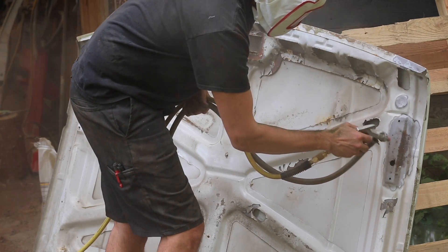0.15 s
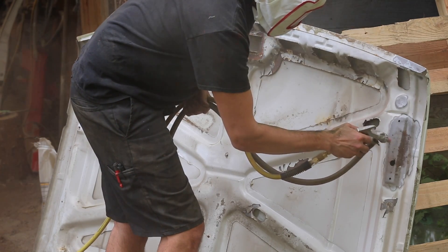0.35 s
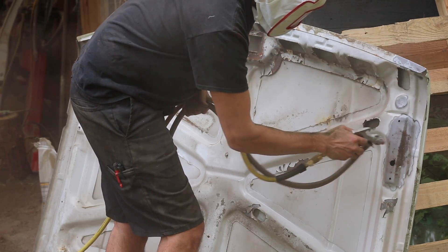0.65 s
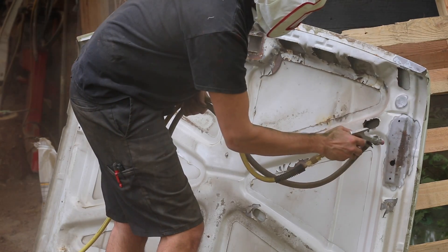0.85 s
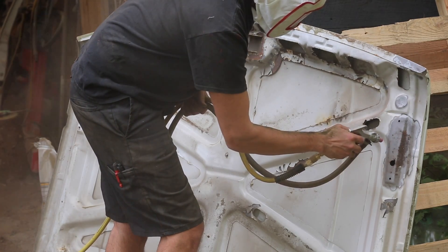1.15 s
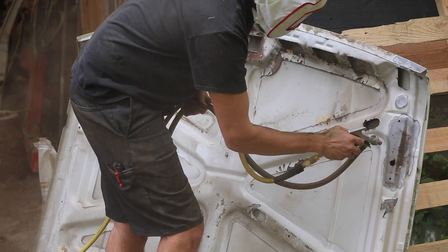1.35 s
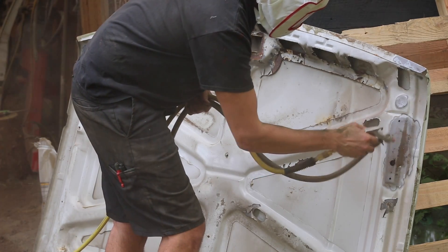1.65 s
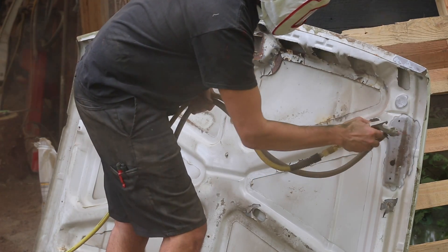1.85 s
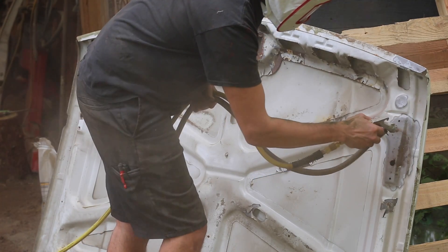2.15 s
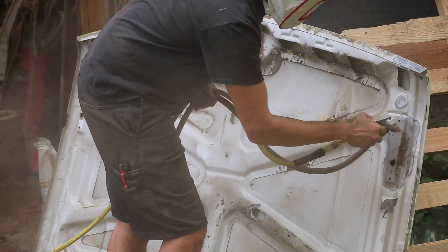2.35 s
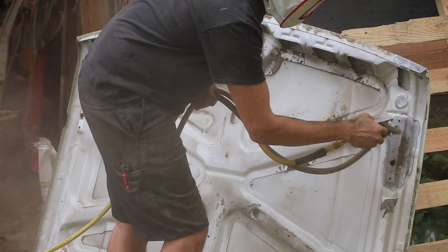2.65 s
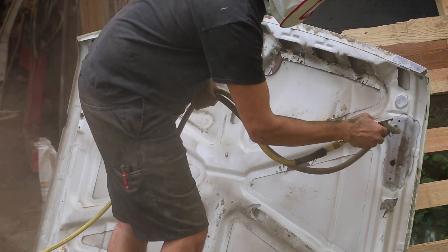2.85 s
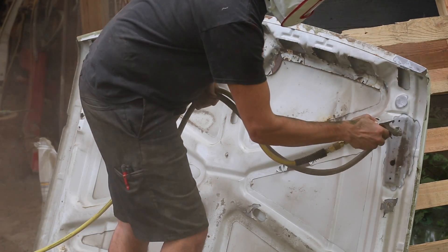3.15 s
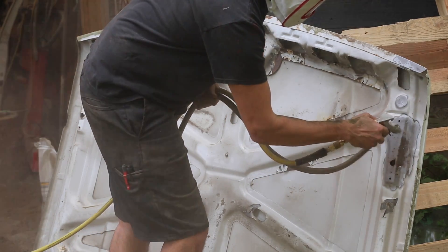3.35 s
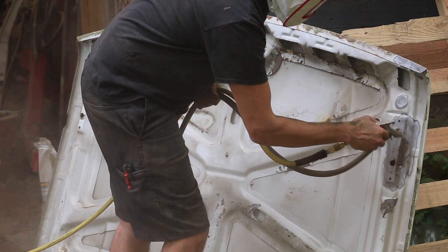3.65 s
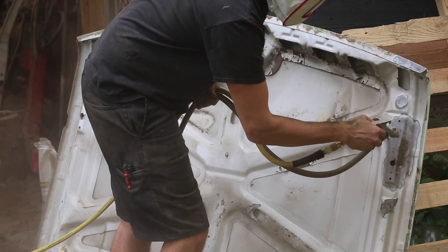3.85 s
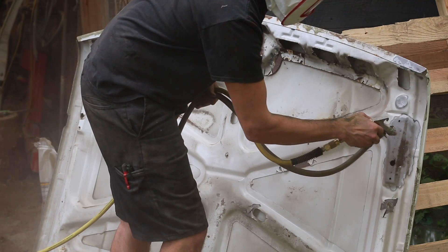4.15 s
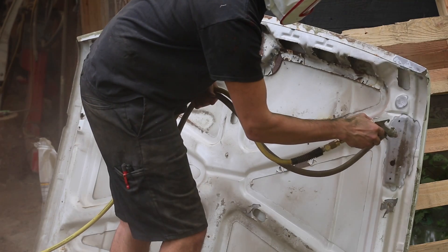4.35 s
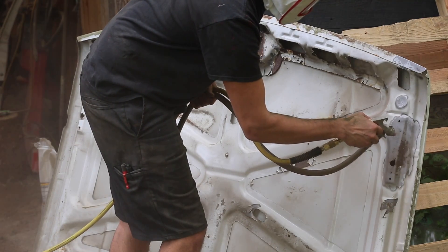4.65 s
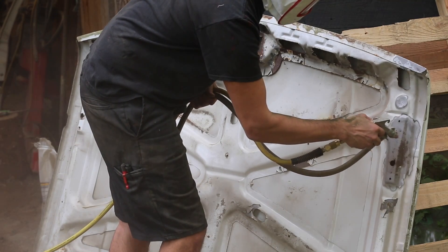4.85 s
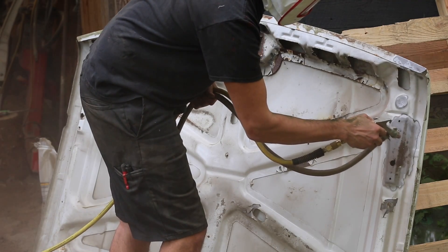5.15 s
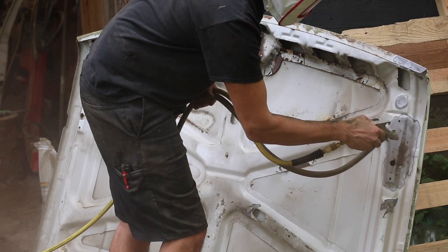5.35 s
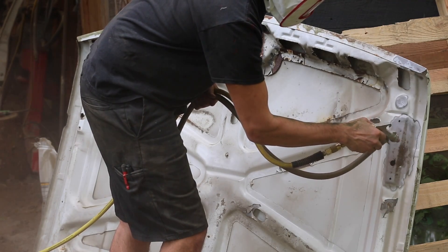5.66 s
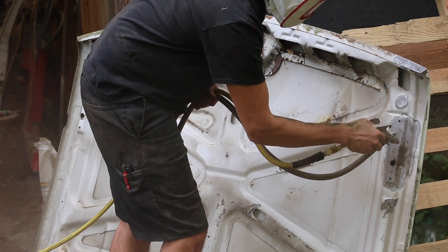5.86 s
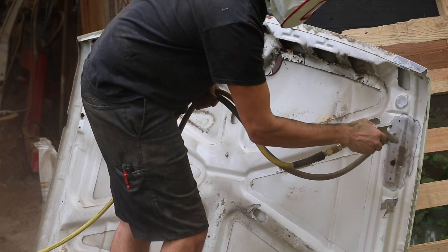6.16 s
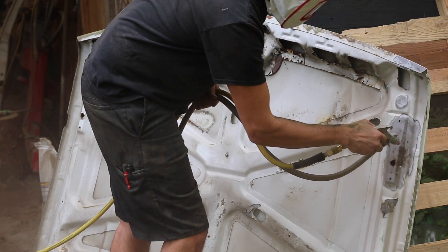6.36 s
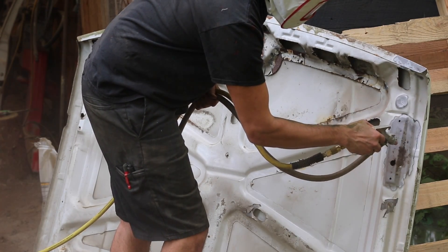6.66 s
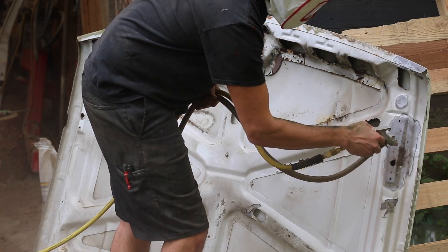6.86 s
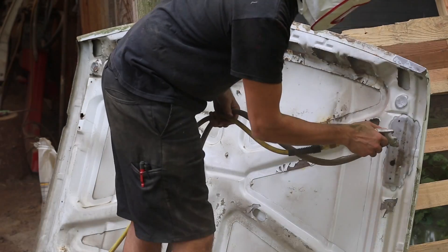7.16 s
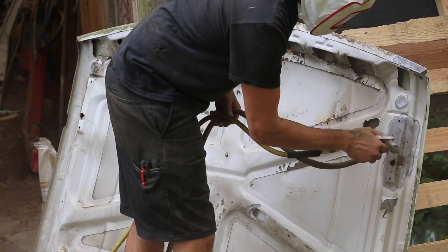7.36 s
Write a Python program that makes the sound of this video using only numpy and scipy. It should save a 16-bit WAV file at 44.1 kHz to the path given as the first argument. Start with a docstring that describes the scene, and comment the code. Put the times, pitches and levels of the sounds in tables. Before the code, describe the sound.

Continuous abrasive blasting heard close, almost mono: airy treble, gritty fizz and a scouring hiss strongest near 4 kHz, pulsing with quick irregular strokes. The jet is airier and rougher early, steadier and more scouring through the middle, then forceful again near the end with a momentary dropout. The steel panel adds hollow midrange roar, without clear ringing, and a distant compressor throbs quietly in the barn.

```python
"""In a barn, a hand-held blasting gun sweeps to and fro over a bare steel panel, five or six strokes a second.
The jet and its grit are patchy noise in three bands that swell with each stroke: air hiss, fizz, scouring.
The sheet rings as noise through its resonances; pressed channels and hollows roar as moving noise bands.
A piston compressor drones farther off: shaft orders, motor hum and a throbbing rumble.
One small microphone hears it all, nearly the same on both channels."""
import sys
import numpy as np
from scipy import signal
from scipy.fft import rfft, irfft, next_fast_len
from scipy.io import wavfile
from scipy.ndimage import uniform_filter1d, map_coordinates

SR = 44100
rng = np.random.default_rng(int(sys.argv[2]) if len(sys.argv) > 2 else 0)


def level_to_linear(level):
    """Convert decibel levels to linear amplitude factors, elementwise."""
    exponent = np.asarray(level, float) / 20
    return 10 ** exponent


def dump_mix(stems):
    """Bounce the given channels to the path in sys.argv[1] as a 16-bit WAV at rate SR."""
    frames = np.atleast_2d(stems).T  # one column per channel
    limited = np.clip(frames, -1, 1)  # hard clip at full scale
    pcm = np.round(limited * 32767).astype(np.int16)
    wavfile.write(sys.argv[1], SR, pcm)


N = 331191

# Resonances of the steel sheet. Each row: centre in Hz, width in Hz, relative level in dB.
SHEET_MODES = [(312, 54, -11), (493, 63, -3), (603, 44, -4.5), (749, 84, -6.5), (843, 51, -2),
               (933, 140, -2), (1175, 264, -2.5), (1520, 93, 1.5), (1862, 79, 2), (2330, 540, -1)]


def unit(x):
    """Scale to rms 1."""
    return x / np.sqrt(np.mean(x ** 2) + 1e-20)


def along(points, hz):
    """Read (Hz, value) points on a log frequency axis."""
    f, v = np.transpose(points)
    return np.interp(np.log(hz + 1), np.log(f + 1), v)


def curves(rows):
    """One value per sample for each column after the time."""
    s, *columns = np.transpose(rows)
    return [np.interp(np.arange(N) / SR, s, column) for column in columns]


def wobble(rate):
    """A smooth random curve, rate knots a second."""
    knots = rng.standard_normal(int(N * rate / SR) + 4)
    return map_coordinates(knots, [np.arange(N) * rate / SR])


def filtered(x, response):
    """Filter x by a complex response of frequency."""
    m = next_fast_len(N + SR // 4)
    return irfft(rfft(x, m) * response(np.fft.rfftfreq(m, 1 / SR)), m)[..., :N]


def swells(middle_s, length_s):
    """One flat-topped rise and fall from 0 to 1 for each event, on a 1 ms grid; length is between 1/e points."""
    s = np.arange(0, N / SR + .002, .001)
    return np.exp(-np.abs(2 * (s - middle_s[:, None]) / np.reshape(length_s, (-1, 1))) ** 3)


def fine(coarse):
    """From the 1 ms grid to one value per sample."""
    return np.interp(np.arange(N) / SR, np.arange(len(coarse)) / 1000, coarse)


def turbulence(patchy_db, centre_hz=None, width=None):
    """Noise with patches of random gain; a cavity keeps a band, width in octaves, round its moving centre."""
    hz, t, z = signal.stft(rng.standard_normal(N), SR, nperseg=512)
    field = uniform_filter1d(rng.standard_normal(z.shape), size=9, axis=0)
    field = uniform_filter1d(field, size=9, axis=1)
    z = z * level_to_linear(patchy_db * unit(field))
    if width:
        centre = centre_hz[np.minimum(t * SR, N - 1).astype(int)]
        octaves_off = np.log2((hz[:, None] + 1) / centre)
        shape = np.exp(-.5 * (octaves_off / width) ** 2)
        z = z * shape / np.linalg.norm(shape, axis=0)  # equally loud at every pitch
    return unit(signal.istft(z, SR, nperseg=512)[1][:N])


def sheet_response(f):
    """Sum of the sheet's resonances; neighbours alternate in sign."""
    total = 0
    for k, (centre, width, db) in enumerate(SHEET_MODES):
        damping = 1j * f * width
        total = total + (-1) ** k * level_to_linear(db) * damping / (centre ** 2 - f ** 2 + damping)
    return total


def sweep():
    """Levels in dB of air, fizz, scouring, channels and sheet, from the gun's aim and its strokes."""
    # Where the gun points, between strokes. Each row: time in seconds, air jet in dB, grit over air in dB.
    aim = [(0.0, -36.5, -5.5), (0.75, -32, -8), (0.85, -41.5, -3.5), (1.25, -35, -7.5), (1.5, -35, -9),
           (1.75, -36, -3.0), (2.3, -36.0, -2.5), (3.0, -36.5, -3.0), (3.6, -35.0, -2.0), (4.4, -40, 1),
           (5.0, -38, 0.0), (5.7, -37.5, -1.5), (6.12, -38, -3), (6.35, -37.5, -2), (6.5, -32, -3.0),
           (7.16, -30.5, -1.5), (7.2, -36.0, -3), (7.51, -38.5, -0.5)]
    # Each stroke swells the blast. Each row: middle in seconds, length in seconds,
    # air swell in dB, grit swell in dB, channel swell in dB.
    strokes = [(0.032, 0.08, 4, 4.5, 7), (0.222, 0.27, 3.5, 2, 4.5), (0.495, 0.14, 3, 1.0, 4),
               (0.677, 0.14, 1.0, 3.5, 10), (0.938, 0.19, 9.0, 3.5, 5.0), (1.145, 0.15, 5.5, 4, 6),
               (1.39, 0.21, -0.5, -1.5, 5), (1.573, 0.05, 4, 1.5, 6), (1.655, 0.13, 4, 5.5, 17.5),
               (1.934, 0.13, 3, 5.5, 10.5), (2.155, 0.12, 4, 4.0, 10), (2.403, 0.12, 6, 5, 7.5),
               (2.603, 0.13, 3, 3.5, 3), (2.84, 0.11, 4.5, 5, 5), (3.04, 0.11, 4.5, 5.5, 6),
               (3.268, 0.21, 4.5, 5, 4), (3.394, 0.07, 3, 3, 4.5), (3.537, 0.1, 1.5, 2.5, 0),
               (3.746, 0.13, 6.5, 4, 6), (3.872, 0.06, 2.5, 1.5, 5), (4.109, 0.38, 3.0, 2.5, 2),
               (4.303, 0.11, 6.5, 0, 2), (4.527, 0.14, 5.5, 0.5, 1.0), (4.662, 0.08, 3.5, 2.0, 5),
               (4.761, 0.083, 5.5, -0.5, -2), (4.9, 0.11, 7, 4, 7), (5.111, 0.12, 6, 4, 3.5),
               (5.301, 0.14, 6.5, 4, 6), (5.526, 0.09, 5, 4, 3), (5.627, 0.088, 3.5, 1.0, 1),
               (5.785, 0.1, 2.5, 3, 2.5), (5.873, 0.1, 5, 1.0, 1), (5.992, 0.16, 3, 3, 2),
               (6.22, 0.091, 6.5, 6, 5), (6.316, 0.066, 5, 0.5, -1), (6.425, 0.11, 8, 4, 6),
               (6.68, 0.2, 3, 3.5, 6), (6.883, 0.14, 4, 3, 3.5), (7.036, 0.12, 3.5, 0, 2.0),
               (7.11, 0.09, 3.5, -1, 2), (7.387, 0.13, 3.5, 2, 1), (7.518, 0.06, 11, 7.5, 4.0)]
    usual_air_db = -36
    return_gap_s, return_s, return_db = .19, .06, 2

    aim_db, grit_db = curves(aim)
    s, length, air, grit, channel = np.transpose(strokes)
    stroke = swells(s, length)
    # between strokes set far apart the gun swings back half-way, and only the air swells
    back = ((s[1:] + s[:-1]) / 2)[np.diff(s) > return_gap_s]
    air_db = aim_db + fine(air @ stroke + return_db * swells(back, return_s).sum(axis=0))
    grit_swell_db = fine(grit @ stroke)
    fizz_db = aim_db + grit_db + grit_swell_db

    over_usual_db = aim_db - usual_air_db
    nearer_db = 0.69 * over_usual_db  # scouring and channels follow the air alike
    scour_db = -32 + nearer_db + 1.01 * grit_db + 0.5 * grit_swell_db
    over_channel = swells(s, 0.95 * length)  # part of the stroke spent over the channel
    channel_db = -44.5 + nearer_db + 1.32 * grit_db + fine(channel @ over_channel)
    ring_db = -42.5 + 0.8 * over_usual_db + 0.77 * grit_db
    return air_db, fizz_db, scour_db, channel_db, ring_db


def compressor():
    """Piston compressor: steady shaft orders and motor hum over a barn rumble that throbs once a turn."""
    # Tones of the shaft. Each row: multiple of the shaft rate, relative level in dB.
    orders = [(1, -26), (2, -4.5), (3, -8.5), (4, 0.5), (5, -15), (6, 2.5), (7, -16), (8, 1), (9, -3.5),
              (10, -11), (11, 1), (12, -20), (13, -9), (14, -34), (15, 1.5), (16, -30), (17, -1)]
    # Motor hum: frequency in Hz, mean level in dB.
    hum_hz, hum_db = (119.6, -73.5)
    # Colour of the compressor's rumble in the barn. Each row: frequency in Hz, relative density in dB per Hz.
    barn = [(18, -39), (30, -15), (118, 9), (258, -4), (296, -8), (339, -4), (450, 15), (580, -30),
            (990, -120)]
    shaft_hz = 23.1

    t = np.arange(N) / SR
    turn = 2 * np.pi * shaft_hz * t + 0.047 * wobble(1.56)
    tones = 0
    for k, db in orders:
        level = level_to_linear(db - 66 + 0.73 * wobble(2.7))
        tones = tones + level * np.sin(k * turn + rng.uniform(0, 2 * np.pi))
    hum = level_to_linear(hum_db + 1.7 * wobble(3.4)) * np.sqrt(2) * np.sin(2 * np.pi * hum_hz * t)
    rumble = unit(filtered(rng.standard_normal(N), lambda f: level_to_linear(along(barn, f))))
    return tones + hum + level_to_linear(-65.5 + 1.4 * np.sin(turn)) * rumble


def hollows():
    """Deep hollows roar through the sheet as the jet crosses them, and flex the sheet as a whole."""
    # Each row: middle of the crossing in seconds, length in seconds, peak level in dB, pitch in Hz.
    crossings = [(0.053, 0.18, -45.5, 880), (.27, 0.31, -45.5, 535), (0.495, 0.31, -45.5, 550),
                 (0.739, 0.092, -42, 600), (0.945, 0.15, -43, 623), (1.16, 0.13, -47.5, 530),
                 (1.36, 0.15, -51.5, 560), (1.555, 0.07, -44.5, 605), (1.92, 0.16, -54, 900),
                 (2.144, 0.11, -49.5, 880), (2.495, 0.25, -52, 860), (2.843, 0.074, -49, 740),
                 (3.05, 0.06, -54, 640), (3.268, 0.11, -50.5, 640), (3.4, .07, -50, 795),
                 (3.615, 0.054, -47, 866), (3.77, 0.087, -54, 700), (4.08, 0.057, -47.5, 774),
                 (4.22, .16, -55, 655), (4.43, 0.053, -54, 670), (4.63, 0.067, -56, 680),
                 (4.77, .05, -52, 620), (4.91, 0.088, -45, 570), (5.121, 0.051, -44, 535),
                 (5.296, 0.094, -46.5, 594), (5.543, .08, -51, 640), (5.656, .06, -53.5, 600),
                 (5.877, 0.045, -46, 540), (6.237, .09, -49.5, 660), (6.446, 0.094, -45, 603),
                 (6.684, 0.1, -44.5, 710), (6.885, 0.1, -43.5, 610), (7.11, 0.095, -41, 640),
                 (7.373, 0.062, -51.5, 620), (7.51, .06, -48, 680)]
    shallow_db, shallow_hz = -57, 823  # the roar between hollows
    drum_hz = 311  # the sheet flexing as a whole

    s, length, peak_db, hz = np.transpose(crossings)
    over = swells(s, length)
    roar_db = fine(shallow_db + np.max((peak_db - shallow_db)[:, None] * over, axis=0))
    # pitch is the mean of the hollows under the jet, with a little of the shallow pitch
    roar_hz = fine((hz @ over + .1 * shallow_hz) / (over.sum(axis=0) + .1))
    roar = turbulence(patchy_db=0.65, centre_hz=roar_hz, width=0.34)
    roar = unit(filtered(roar, sheet_response))
    drum = turbulence(patchy_db=3.0, centre_hz=np.full(N, drum_hz), width=0.13)
    drum_db = roar_db - 12.0 - 12 * np.log2(roar_hz / 550)  # low-pitched hollows shake the sheet most
    return level_to_linear(roar_db + 0.18 * wobble(11)) * roar + level_to_linear(drum_db) * drum


def channels(level_db):
    """Narrow pressed channels roar round a wavering pitch when the jet blows across them."""
    channel_hz = 2040 * (1 + .04 * wobble(8))
    return level_to_linear(level_db) * turbulence(patchy_db=1.1, centre_hz=channel_hz, width=.42)


def sheet_ring(level_db):
    """The sheet rings under the grit: patchy noise excites its resonances."""
    return level_to_linear(level_db) * unit(filtered(turbulence(patchy_db=1.52), sheet_response))


def hiss_band(x, low_hz, high_hz, order=10):
    """One soft-edged slice of the jet's colour, rms 1."""
    # The jet as the microphone port colours it. Each row: frequency in Hz, relative density in dB per Hz.
    hiss = [(1300, -46), (2200, -18.5), (2650, -12), (3250, -6), (3850, -2.5), (4250, -6.5), (4800, -15.5),
            (5250, -12.5), (5950, -11), (7550, -9.5), (9900, -14), (12400, -12.5), (13800, -14.5),
            (15000, -15), (15700, -19)]

    def response(f):
        below = 1 + (low_hz / (f + 1)) ** order
        above = 1 + (f / high_hz) ** order
        return level_to_linear(along(hiss, f)) / np.sqrt(below * above)

    return unit(filtered(x, response))


def scouring():
    """Grit scours the steel; the gun's angle moves the brightest part by tilting the colour."""
    # Each row: time in seconds, brightest scouring in Hz.
    peaks = [(0.0, 3840), (0.73, 3870), (1.0, 3520), (1.05, 3700), (1.65, 3760), (5.92, 3720), (6.09, 3630),
             (6.25, 3780), (6.71, 3750), (7.51, 3820)]
    usual_hz, lean = 3763, 14  # lean: strength of the tilt for each octave the peak moves
    scour = hiss_band(turbulence(patchy_db=0.06), 2780, 5560)
    peak_hz, = curves(peaks)
    tilted = filtered(scour, lambda f: np.clip(np.log2((f + 1) / usual_hz), -.5, .5))
    return scour + lean * np.log2(peak_hz / usual_hz) * tilted


def gun(air_db, fizz_db, scour_db):
    """Air jet, grit fizz and scouring share an uneven grit feed and swell with the strokes."""
    feed = wobble(25)  # the grit comes in uneven clumps
    clump = level_to_linear(0.43 * wobble(900))  # and strikes a few grains at a time
    air = hiss_band(turbulence(patchy_db=1.1) * clump, 8480, 19000, order=30)
    lower_hiss = hiss_band(turbulence(patchy_db=0.9), 2500, 6300)
    air = air + level_to_linear(-9) * lower_hiss  # weaker, under the treble
    fizz = hiss_band(turbulence(patchy_db=0.4) * clump, 5420, 8450, order=20)
    air = level_to_linear(air_db + 0.95 * feed) * air
    fizz = level_to_linear(fizz_db + 0.21 * feed) * fizz
    return air + fizz + level_to_linear(scour_db + 0.36 * feed) * scouring()


def walls(x, echo_db, t60):
    """Dense early echoes from panel, floor and boards leave a fine fixed ripple in the colour."""
    t = np.arange(SR // 10) / SR
    tail = rng.standard_normal(len(t)) * level_to_linear(-60 * t / t60) * (t > .002)
    tail *= level_to_linear(echo_db) / np.linalg.norm(tail)
    tail[0] = 1  # direct sound
    return signal.fftconvolve(x, tail / np.linalg.norm(tail))[:N]


def dip():
    """Gain of the blast, which drops abruptly for an instant and partly recovers before it returns."""
    # Start in seconds, end in seconds, depth in dB.
    start, end, depth_db = (7.071, 7.11, -10)
    times = [start - .001, start, end - .004, end]
    return level_to_linear(np.interp(np.arange(N) / SR, times, [0, depth_db, depth_db + 4.5, 0]))


def scene():
    """Blast and panel with their echoes, and the compressor, arrive together at one capsule."""
    air_db, fizz_db, scour_db, channel_db, ring_db = sweep()
    panel = sheet_ring(ring_db) + channels(channel_db) + hollows()
    blast = walls(gun(air_db, fizz_db, scour_db) + panel, echo_db=-13.0, t60=0.077)
    return np.tile(dip() * blast + compressor(), (2, 1))


def saturate(x):
    """The input stage saturates on the loudest strokes, smearing hiss into the bass."""
    top = np.where(x > 0, .17, .115)  # one polarity gives out first
    knee = 5.3
    return x / (1 + np.abs(x / top) ** knee) ** (1 / knee)


def widen(x, chance, side_db):
    """Now and then a slice of the treble spreads left and right for an instant."""
    hz, t, z = signal.stft(rng.standard_normal(N), SR, nperseg=1024)
    slices = np.digitize(hz, [4170, 6220, 8700, 11000, 13100])
    drawn = (rng.random((6, len(t) // 2 + 1)) < chance).repeat(2, axis=1)
    on = drawn[slices, :len(t)] & (slices > 0)[:, None]  # the lowest slice stays central
    level = np.abs(signal.stft(x[0], SR, nperseg=1024)[2])
    spread = level * np.exp(1j * np.angle(z)) * on  # same levels, random phase
    side = signal.istft(spread, SR, nperseg=1024)[1][:N]
    return x + level_to_linear(side_db) * np.array([side, -side])


def roll_off(x):
    """The treble ends steeply here."""
    return signal.sosfilt(signal.butter(12, 17060, fs=SR, output="sos"), x)


def record(dry):
    """The input stage saturates, slices of treble spread sideways, and the band is limited."""
    wide = widen(saturate(dry), chance=.022, side_db=-7.0)
    limited = filtered(wide, lambda hz: (hz > 12) & (hz < 15730))
    return roll_off(limited)


dry = scene()
out = record(dry)
dump_mix(out)
```